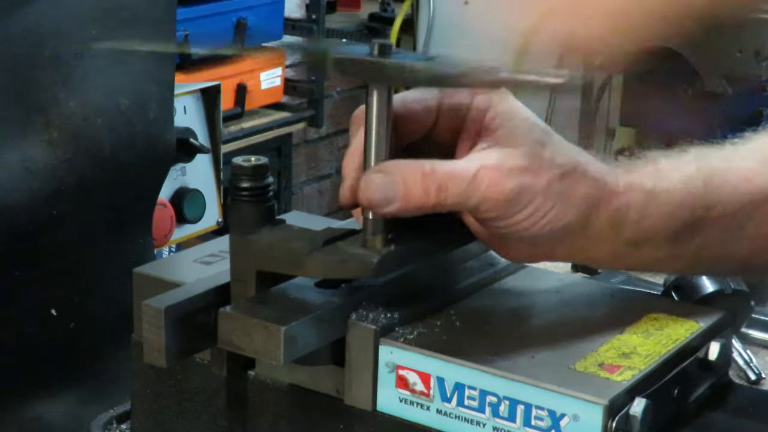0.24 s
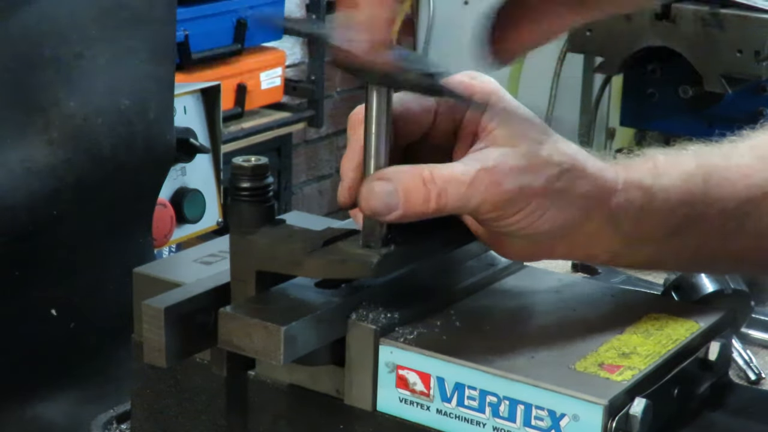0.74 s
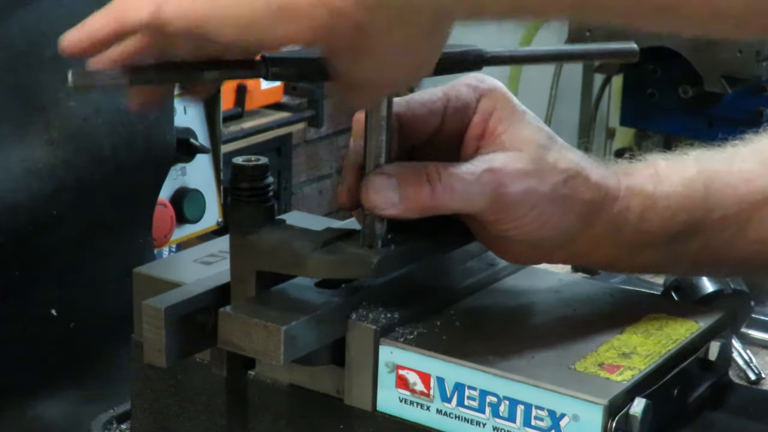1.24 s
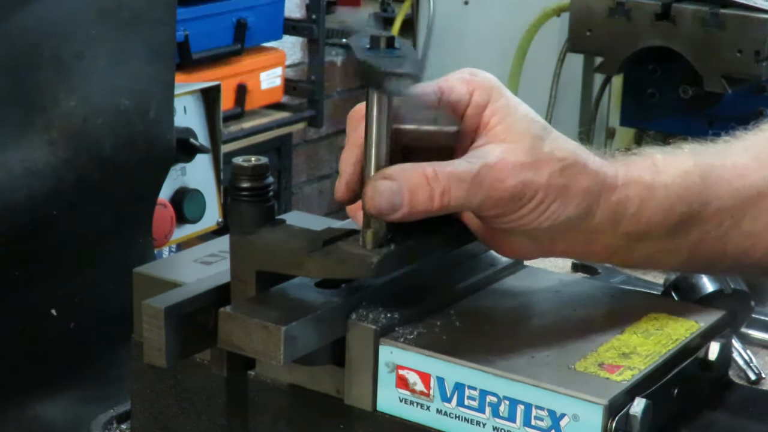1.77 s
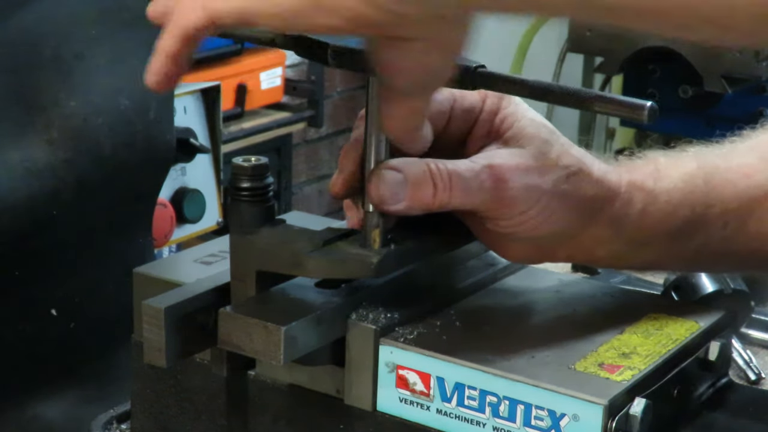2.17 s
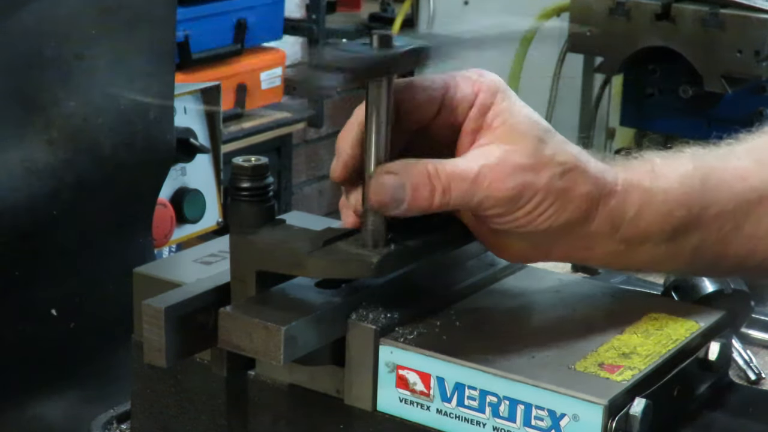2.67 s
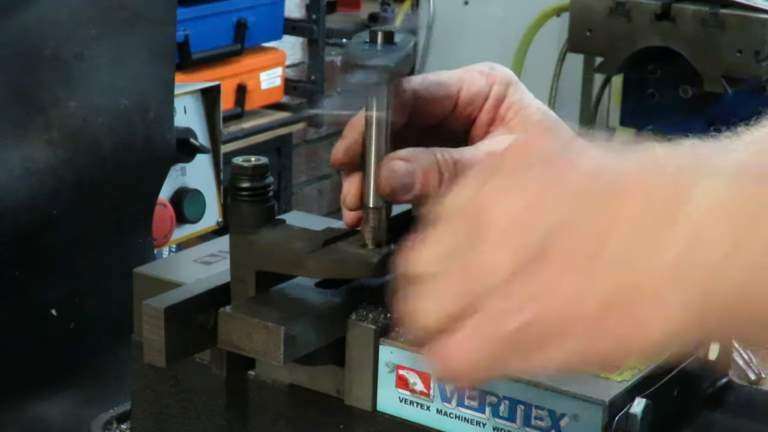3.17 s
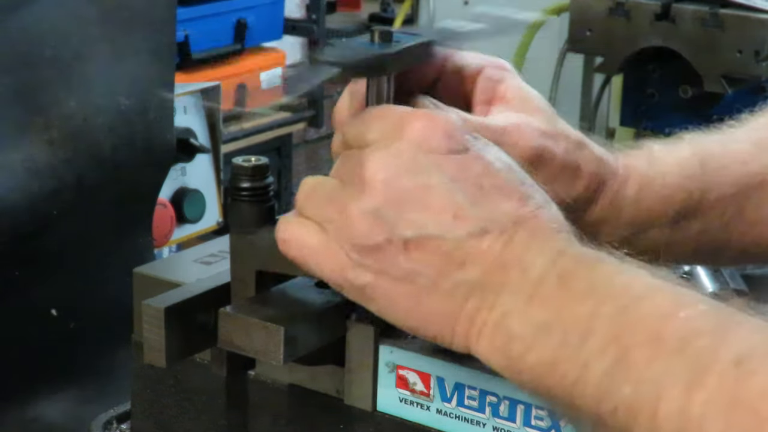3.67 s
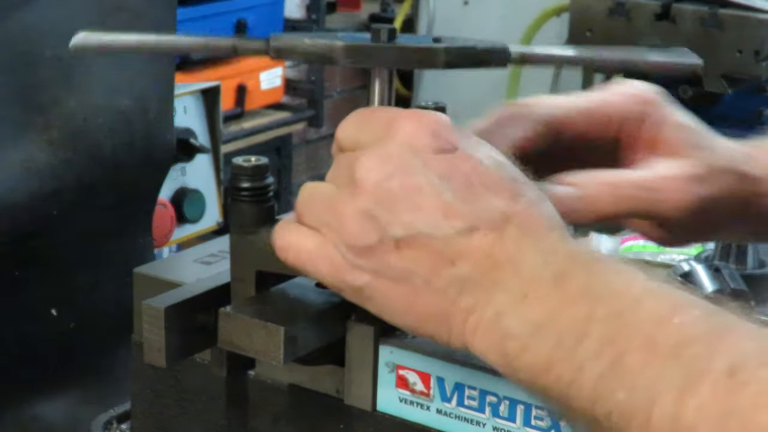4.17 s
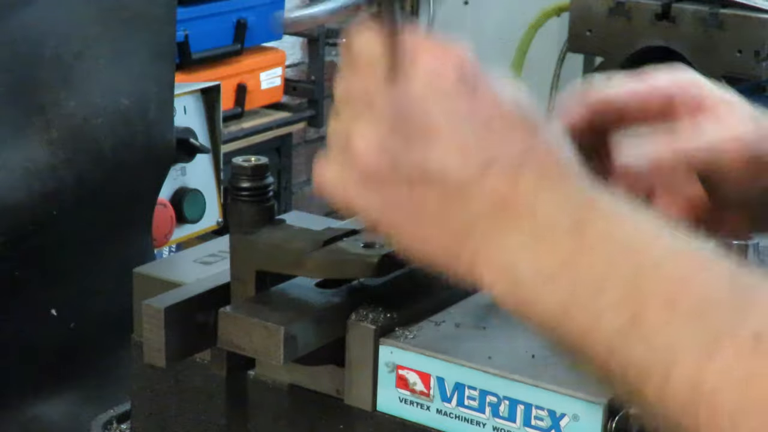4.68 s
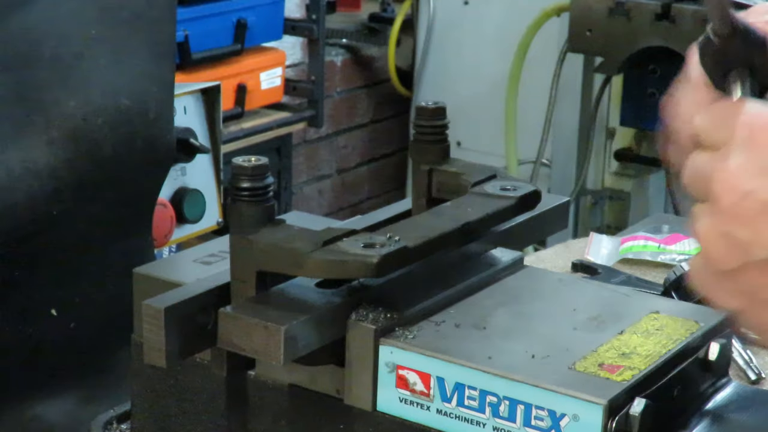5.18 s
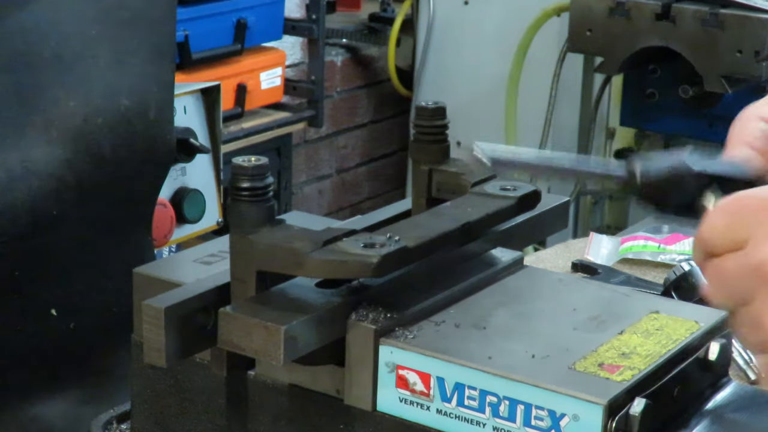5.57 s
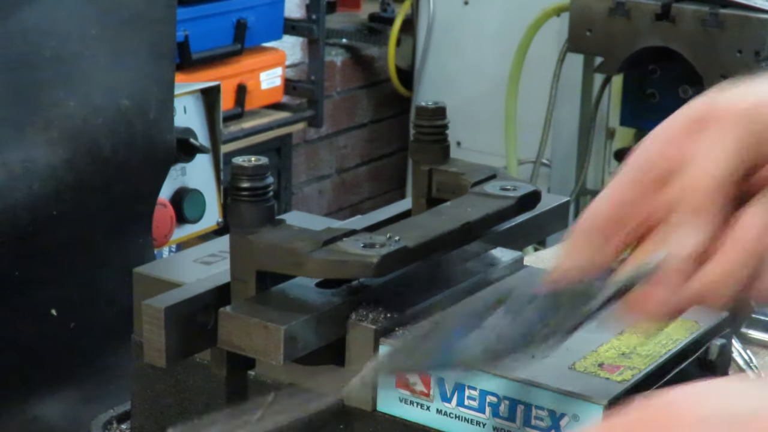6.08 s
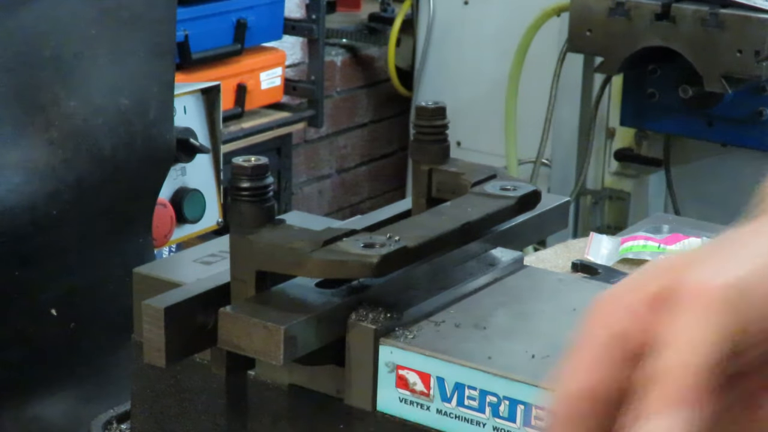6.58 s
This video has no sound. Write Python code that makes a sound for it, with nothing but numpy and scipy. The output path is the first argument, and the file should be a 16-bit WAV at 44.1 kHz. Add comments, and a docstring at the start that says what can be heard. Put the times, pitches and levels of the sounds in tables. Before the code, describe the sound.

A tap wrench spins back out of threaded steel with rasping, chirping scrapes and knocks, then a metal bar drops ringing and the wrench is laid down.

```python
"""A hand tap rasps and rattles as a wrench spins it back out of a threaded steel part in a small workshop.
The rub is made of tiny random slips, coloured by filters and resonances and driven by the wrench's swings.
Knocks, the clamp bar dropping on the vice, clinks, clicks and the wrench being laid down are made of
short contact noise plus ringing modes; the vice booms, the wrench slides, thuds and jingles.
Echoes, mains hum and quiet ventilation noise fill the workshop."""
import sys
import numpy as np
from scipy import signal
from scipy.fft import rfft, irfft
from scipy.io import wavfile
from scipy.ndimage import uniform_filter1d

SR = 44100
rng = np.random.default_rng(int(sys.argv[2]) if len(sys.argv) > 2 else 0)


def wav_record(signal):
    """Record a signal, one row per channel, as 16-bit PCM in the file named by sys.argv[1]."""
    frames = np.transpose(np.atleast_2d(signal))
    bounded = np.clip(frames, -1, 1)
    # unit amplitude maps onto the largest positive 16-bit level
    quanta = np.round(bounded * 32767).astype(np.int16)
    wavfile.write(sys.argv[1], SR, quanta)


N = 300753
HZ = np.fft.rfftfreq(4096, 1 / SR)  # frequencies at which filter curves are drawn

# ringing modes of the vice: (frequency [Hz], relative level [dB], time to fall 60 dB [s])
VICE_MODES = [(151, -29.5, 0.3), (316.7, -27.5, 0.27), (370, -19.5, 0.62), (408, -30, 0.4),
              (437.3, -19.5, 0.34), (574, -29, 0.4), (598, -28, 0.7)]


def gain_of(db):
    """Turns decibels into an amplitude factor."""
    return 10 ** (np.asarray(db) / 20)


def evened(x):
    """Scales a sound to an rms of 1."""
    return x / np.sqrt(np.mean(x ** 2) + 1e-20)


def read(points, hz):
    """Reads a curve between its points, along a logarithmic frequency axis."""
    point_hz, value = np.transpose(points)
    return np.interp(np.log(hz + 1), np.log(point_hz + 1), value)


def fading(t, t60):
    """Exponential decay that falls 60 dB in t60 seconds."""
    return np.exp(-np.log(1000) * t / t60)


def add(mix, s, sound):
    """Mixes a sound in, starting at s seconds."""
    part = mix[max(round(s * SR), 0):][:len(sound)]
    part += sound[:len(part)]


def colour(x, db):
    """Filters with the gain curve db over HZ; it rings after a click, never before (minimum phase)."""
    cepstrum = irfft(np.log(gain_of(np.maximum(db - db.max(), -100))))
    half = len(cepstrum) // 2
    # folding the cepstrum forward puts the whole response after the click
    cepstrum[1:half] *= 2
    cepstrum[half + 1:] = 0
    response = irfft(np.exp(rfft(cepstrum)))
    return signal.oaconvolve(x, response)[:len(x)]


def resonate(x, hz, width):
    """A resonance of gain 1, width in Hz, whose pitch follows the curve hz."""
    turn = np.exp(2j * np.pi * np.cumsum(hz) / SR)
    r = np.exp(-np.pi * width / SR)
    # shift the pitch down to zero, smooth, and shift it back up
    return 2 * (turn * signal.lfilter([1 - r], [1, -r], x / turn)).real


def wander(per_s):
    """A slow random curve of rms 1 that changes about per_s times a second."""
    count = 8192
    hz = np.fft.rfftfreq(count, N / SR / count)
    slow = irfft(rfft(rng.standard_normal(count)) * np.exp(-(hz / per_s) ** 2))
    return evened(np.interp(np.arange(N), np.linspace(0, N, count), slow))


def slips(per_s, spread_db):
    """A random train of tiny slips of either sign, a few larger than the rest."""
    size = gain_of(spread_db * np.minimum(rng.exponential(1, N), 3.5))
    sign = rng.choice([-1., 1.], N)
    happens = rng.random(N) < per_s / SR
    return evened(size * sign * happens)


def stroke(s, db, rise_s, hold_s, stop_s):
    """The gain of one sliding motion: it speeds up until s, holds, and friction slows it evenly."""
    times = s + np.array([-rise_s, 0, hold_s, hold_s + stop_s])
    speed = np.interp(np.arange(N) / SR, times, [0, 1, 1, 0])
    return gain_of(db) * speed ** 2.76  # loudness grows as this power of the speed


def tap_resonance():
    """The lift in dB that the resonances of tap and work give to whatever shakes them."""
    # resonances: (frequency [Hz], width [Hz], lift [dB])
    tap_peaks = [(631, 76, 2.2), (963, 350, 1.5), (1272, 94, 0.72), (1550, 58, 1.77), (1640, 173, 5),
                 (2170, 490, 5.6), (3074, 115, 8.1), (3620, 280, 5.4), (4120, 520, 3.4), (10100, 820, 3.9)]
    return sum(db / (1 + (2 * (HZ - hz) / width) ** 2) for hz, width, db in tap_peaks)


def blows(rows, contact_db, modes, level_db, ring_db, chatter_db, mid_db, vary_db=0, detune=0,
          build_s=0.00071):
    """Each blow is one contact, a dying chatter of the faces, and the ring of the struck steel.

    bass, mid_db and treble set each blow's hardness curve, which counts relative to mid_db;
    level_db shifts every blow's level."""
    shank_db, shank_width_hz = 9.5, 160
    out, t = np.zeros(N), np.arange(SR // 2) / SR
    for s, db, bass_db, treble_db, chatter_s, *shank_hz in rows:
        hardness = read([(600, bass_db), (1400, mid_db), (2800, mid_db), (6500, treble_db)], HZ) - mid_db
        # the tap's shank resonates at a pitch that depends on how it is gripped and seated
        shank = sum(shank_db / (1 + (2 * (HZ - f) / shank_width_hz) ** 2) for f in shank_hz)

        touches = rng.random(len(t)) < .15
        force = rng.standard_normal(len(t)) * touches * np.exp(-t / chatter_s)
        force *= 1 - np.exp(-t / build_s)
        force *= gain_of(chatter_db) / (np.linalg.norm(force) + 1e-9)
        force[0] += 1  # the first contact
        crack = colour(force, contact_db + hardness + shank)
        # the loudest 200 samples get an rms of 1
        crack /= np.sqrt(uniform_filter1d(crack ** 2, size=200, mode="constant").max())

        ring = np.zeros(len(t))
        # each striking place favours other modes, and the grip shifts their pitch
        chances = rng.uniform(-1.03, 1, (len(modes), 2))
        for (hz, mode_db, t60), (luck, shift) in zip(modes, chances):
            size = gain_of(mode_db + vary_db * luck + np.interp(hz, HZ, hardness) / 2)
            ring += size * fading(t, t60) * np.sin(2 * np.pi * hz * (1 + detune * shift) * t)
        add(out, s, gain_of(db + level_db) * (crack + gain_of(ring_db) * ring))
    # deep bass is taken out of every blow
    return signal.sosfilt(signal.butter(6, 112, "high", fs=SR, output="sos"), out)


def workshop(air_db=-49, waver_db=0.3):
    """Ventilation is steady filtered noise; mains equipment hums in sines whose level wavers."""
    # ventilation spectrum: (frequency [Hz], relative level per Hz [dB])
    air_colour = [(12, -58), (20, -19), (68, -12), (101, -8.5), (200, -11.5), (399, -9.5), (527, -14),
                  (678, -15), (849, -19), (1030, -18), (11400, -43), (14000, -47), (15300, -74)]
    # stereo width of the ventilation: (frequency [Hz], side gain [dB])
    air_width = [(60, -25.5), (150, 0.5), (380, 4.5), (950, 1), (2380, 0.5), (5980, 0), (15000, -1)]
    # mains hum: (frequency [Hz], rms level [dB])
    hum_tones = [(100, -60), (200, -60)]
    hz, t = np.fft.rfftfreq(N, 1 / SR), np.arange(N) / SR
    spectrum = rfft(rng.standard_normal((2, N))) * gain_of(read(air_colour, hz))
    spectrum[1] *= gain_of(read(air_width, hz))
    mid, side = irfft(spectrum, N)
    air = evened(np.array([mid + side, mid - side]))
    hum = np.zeros(N)
    for f, db in hum_tones:
        level = np.sqrt(2) * gain_of(db + waver_db * wander(per_s=6))
        hum += level * np.sin(2 * np.pi * (f * t + rng.random()))
    return gain_of(air_db) * air + hum


def room(x, rise_s=0.0012):
    """Sparse echoes that die band by band; the two channels differ most in the treble."""
    # decay of the echoes: (frequency [Hz], time to fall 60 dB [s])
    room_t60 = [(150, 0.37), (600, 0.52), (1700, 0.3632), (4600, 0.4241), (12000, 0.2345)]
    # stereo width of the echoes: (frequency [Hz], side gain [dB])
    room_width = [(150, -11.5), (600, -15.5), (1500, -13), (4000, -10.5), (8000, -2.5), (13000, 2)]
    size = 32768
    taps = rng.choice([-1., 1.], (2, size)) * (rng.random((2, size)) < 4000 / SR)
    hz, t, bands = signal.stft(taps, SR, nperseg=256)
    bands = bands * fading(t, read(room_t60, hz)[:, None])
    bands[1] *= gain_of(read(room_width, hz))[:, None]
    tail = signal.istft(bands, SR, nperseg=256)[1]
    tail *= 1 - np.exp(-(np.arange(tail.shape[1]) / SR / rise_s) ** 2)
    mid, side = signal.fftconvolve(x[None], tail / np.linalg.norm(tail[0]), axes=1)[:, :N]
    return np.array([mid + side, mid - side])


def table_thud():
    """The wrench lands on the table: dull contacts and one short mode."""
    # landings: (time [s], relative level [dB], bass [dB], treble [dB], chatter decay [s])
    landings = [(6.4735, -12, -8, -16, 0.0002), (6.4785, -19.5, -2, -27, 0.0094),
                (6.524, -27, -10, -22, 0.006), (6.556, -30, 1, -40, 0.0028),
                (6.611, -26.5, -5.5, -37, 0.006)]
    # contact spectrum: (frequency [Hz], relative level per Hz [dB])
    contact = [(88, -54), (150, -22), (400, -7), (760, -2.5), (1200, -3.5), (1450, -15), (2000, -15),
               (2650, -33), (4340, -50), (9000, -90)]
    # ringing modes: (frequency [Hz], relative level [dB], time to fall 60 dB [s])
    modes = [(793, -2, 0.059)]
    return blows(landings, read(contact, HZ), modes, level_db=-4.5, ring_db=-12, chatter_db=1, mid_db=-6.5)


def handle_note(hz=4228, struck_t60=0.039, sing_at_s=6.63, sing_db=-34, swell_db_per_s=190, free_t60=0.31):
    """The handle's bending note: short pings when struck, then it swells as the steel skids, and rings out."""
    # strikes on the handle's free end: (time [s], level [dB])
    pings = [(6.405, -46), (6.424, -32), (6.499, -19.5)]
    t = np.arange(N) / SR
    struck = sum(gain_of(db) * (t >= s) * fading(abs(t - s), struck_t60) for s, db in pings)
    growing = gain_of(swell_db_per_s * np.minimum(t - sing_at_s, 0))
    dying = fading(np.maximum(t - sing_at_s, 0), free_t60)
    return (struck + gain_of(sing_db) * growing * dying) * np.sin(2 * np.pi * hz * t)


def handle_jingle():
    """The handle jingles as the wrench is laid down: bright blows that each favour other modes."""
    # blows: (time [s], relative level [dB], bass [dB], treble [dB], chatter decay [s])
    jingles = [(6.3975, -29.5, -2, -25, 0.005), (6.4053, -21.5, -27, -14.5, 0.0042),
               (6.4233, -25, -25, -17, 0.0088), (6.4991, -15, -19, -9.5, 0.0046),
               (6.5294, -20, -17, -17, 0.0085), (6.6114, -17.5, -18, -12.5, 0.011),
               (6.6324, -20.5, -43, -13, 0.015), (6.6942, -20.5, -28, -16, 0.016),
               (6.8009, -27.5, -30, -21, 0.0097)]
    # contact spectrum: (frequency [Hz], relative level per Hz [dB])
    contact = [(290, -2.5), (500, -0.5), (1070, -4), (1880, -9), (3400, 1), (4700, -6.5), (5900, -10),
               (7900, -11), (9200, -17), (10700, -6), (12500, -15), (14000, -15), (15500, -24)]
    # ringing modes: (frequency [Hz], relative level [dB], time to fall 60 dB [s])
    modes = [(3450, -14, 0.11), (5810, -7.5, 0.11), (5950, -4, 0.1), (7050, -11, .08), (7930, -4.5, 0.094),
             (8800, -11, 0.1), (10560, -9.5, 0.15), (11900, -14, .1), (14000, -13, 0.076), (14135, -8, .1)]
    return blows(jingles, read(contact, HZ), modes, level_db=-11.0, ring_db=-11.5, chatter_db=14,
                 mid_db=-19.0, vary_db=10.0, detune=0.012, build_s=0.00074)


def jaw_clicks():
    """The wrench clicks in the hand: its jaws ring very briefly."""
    # clicks: (time [s], relative level [dB], bass [dB], treble [dB], chatter decay [s])
    clicks = [(5.9189, -26, -28, -21, 0.0056), (5.9234, -26, -10, -12, 0.002),
              (5.9444, -40, -34, -37, 0.0039)]
    # contact spectrum: (frequency [Hz], relative level per Hz [dB])
    contact = [(410, -49), (700, -26), (1100, -9), (1780, -27), (1950, -9), (2770, -3), (4770, -14.5),
               (5790, -12), (9230, -18), (10900, -10.5), (14500, -27), (15500, -36)]
    # ringing modes: (frequency [Hz], relative level [dB], time to fall 60 dB [s])
    modes = [(2070, -2, 0.089), (2560, 5, 0.08), (2690, 4, 0.08), (3320, -14, 0.054), (3440, 0, 0.06),
             (3940, 6, 0.05), (6000, -13, 0.06)]
    return blows(clicks, read(contact, HZ), modes, level_db=-5.5, ring_db=-11.0, chatter_db=20, mid_db=-20.0)


def slide():
    """The handle slides through the fingers: a short dry swish made of dense slips."""
    # spectrum of the swish: (frequency [Hz], relative level per Hz [dB])
    swish_colour = [(530, -53), (900, -21), (1090, -1), (1270, -23), (1890, -5), (2990, -6.5), (6000, -6),
                    (11400, -24), (12900, -7), (15000, -46.5)]
    speed = stroke(s=5.81, db=-45.5, rise_s=0.076, hold_s=0.0061, stop_s=0.05)
    swish = colour(slips(per_s=4200, spread_db=5.5), read(swish_colour, HZ) + tap_resonance())
    return speed * evened(swish)


def part_clink():
    """A loose steel part is struck as the hand leaves, and its modes ring."""
    # blows: (time [s], relative level [dB], bass [dB], treble [dB], chatter decay [s])
    clinks = [(5.0969, -23, -17.5, -17.5, 0.012)]
    # contact spectrum: (frequency [Hz], relative level per Hz [dB])
    contact = [(150, -51), (300, -27), (660, -2), (829, -20), (1200, -10), (1800, -15.5), (2500, -23.5),
               (3440, -14), (5100, -26.5), (5850, -23), (12000, -31), (15000, -41)]
    # ringing modes: (frequency [Hz], relative level [dB], time to fall 60 dB [s])
    modes = [(376, -20.5, 0.76), (660, -12, 0.19), (696.9, -2, 0.45), (1470, -9, 0.32), (1885, -9, 0.15),
             (2970, -13.5, 0.18), (3310, -13, 0.16), (3530, -8, 0.11), (5920, -6.5, 0.063),
             (10200, -13, 0.12)]
    return blows(clinks, read(contact, HZ), modes, level_db=-1.0, ring_db=-3.0, chatter_db=10, mid_db=-17.5)


def vice_boom(struck_s=4.7944, build_s=0.0034, level_db=1, rattle_db=0.5, settle_s=4.934, choke_s=0.006):
    """The vice booms in close, beating modes while the bar rattles on it; the bar lies flat and chokes them."""
    out, t = np.zeros(N), np.arange(SR // 2) / SR
    ring = sum(gain_of(db) * fading(t, t60) * np.sin(2 * np.pi * hz * t) for hz, db, t60 in VICE_MODES)
    choke = np.exp(-np.maximum(struck_s + t - settle_s, 0) / choke_s)
    add(out, struck_s, ring * (1 - np.exp(-t / build_s)) * choke)
    # the rattle makes the level waver
    return out * gain_of(level_db + rattle_db * wander(per_s=70))


def bar_drop():
    """The clamp bar drops on the vice and bounces: hard contacts and the bar's long high modes."""
    # blows: (time [s], relative level [dB], bass [dB], treble [dB], chatter decay [s])
    drops = [(4.7878, -12.5, -5, -23, 0.01), (4.7944, -9.5, -18, -14, 0.002),
             (4.8035, -20.5, -10.5, -14.5, 0.029), (4.8345, -18.5, 4.5, -16, 0.001),
             (4.8645, -23, 5, -27, 0.0015)]
    # contact spectrum: (frequency [Hz], relative level per Hz [dB])
    contact = [(90, -54), (140, -36), (250, -14.5), (400, -2), (505, -10.5), (590, -6.5), (814, -12.5),
               (1160, -8), (1400, -12.5), (2420, -12), (2860, -16), (3180, -13.5), (6910, -24.5),
               (10300, -23), (11200, -16.5), (13200, -26), (15000, -55)]
    # ringing modes: (frequency [Hz], relative level [dB], time to fall 60 dB [s])
    modes = [(2426, -11.5, 0.2), (3180, -6.5, 0.16), (3880, -5, .18), (5980, -16, 0.19), (10850, -14, 0.62),
             (10840, -10, 0.9)]
    return blows(drops, read(contact, HZ), modes, level_db=-1.0, ring_db=-16.5, chatter_db=8.5, mid_db=-14.0)


def palm_bump():
    """The palm bumps the handle to start it spinning: a soft contact with no ring."""
    # bumps: (time [s], relative level [dB], bass [dB], treble [dB], chatter decay [s])
    bumps = [(0.288, -35, -20, -20, 0.019)]
    # contact spectrum: (frequency [Hz], relative level per Hz [dB])
    contact = [(50, -11), (135, -8), (250, -29), (450, -4), (900, -14), (3000, -55)]
    return blows(bumps, read(contact, HZ), [], level_db=1.0, ring_db=0, chatter_db=25, mid_db=-24)


def tip_ticks():
    """The freed tip of the tap ticks on the mouth of the hole, ringing for a moment."""
    # ticks: (time [s], relative level [dB], bass [dB], treble [dB], chatter decay [s])
    ticks = [(3.609, -27, -17, -8.5, 0.003), (3.776, -16, -22, -21.5, 0.0047),
             (4.19, -19, -14.5, -4, 0.0036)]
    # contact spectrum: (frequency [Hz], relative level per Hz [dB])
    contact = [(500, -24), (1900, -5.5), (2700, -8.5), (3500, 3), (3850, -7), (4400, -7.5), (5700, -18.5),
               (9800, -15.5), (11300, -22), (13200, -25), (15000, -55)]
    # ringing modes: (frequency [Hz], relative level [dB], time to fall 60 dB [s])
    modes = [(3156, 1, 0.07), (3540, 1.5, 0.047), (4290, -1.5, 0.06)]
    return blows(ticks, read(contact, HZ), modes, level_db=-12.0, ring_db=-9.5, chatter_db=11, mid_db=-14.5)


def tap_knocks():
    """The wrench and the loose tap knock together; the shank adds its own resonance to every knock."""
    # knocks: (time [s], relative level [dB], bass [dB], treble [dB], chatter decay [s], shank pitch [Hz])
    knocks = [(0.008, -34.5, 3, -12.5, 0.019, 2950), (0.281, -23.5, -1, -10.5, 0.0094, 2830),
              (0.36, -12, -24, -34, 0.036, 3080), (0.365, -13, -24, -1, 0.0055, 3150),
              (0.3705, -13.5, -8, 3, 0.0026, 3100), (0.404, -23, -31, -27, 0.017, 3440),
              (0.4325, -19.5, -18, -48, 0.0047, 3400), (0.561, -32, -21, -40, 0.0068, 3110),
              (0.591, -19.5, -14, -19.5, 0.0083, 2810), (0.679, -20, -8, -7.5, 0.01, 3300),
              (0.706, -16.5, -4, -14.5, 0.0082, 3160), (0.875, -37, 1, -16, 0.0054, 3430),
              (1.397, -48, -11, -20, 0.004, 3120), (1.466, -26.5, -22, -27, 0.011, 3120),
              (1.5465, -23, -16, -41, 0.003, 2500), (1.577, -20, -5, -40, 0.012, 3180),
              (1.604, -22.5, -5, -21, 0.0034, 3130), (1.799, -22, -10.5, -70, 0.0062, 3320),
              (1.813, -24.5, -1, -78, 0.024, 3200), (1.986, -35, -19, -18.5, 0.0056, 3780),
              (2.746, -24, 2, -13, 0.016, 3100), (3.14, -34.5, 5, -18, 0.012, 3230),
              (3.311, -33.5, -12, -21, 0.011, 4200), (3.33, -27, -13, -19.5, 0.0092, 4180),
              (3.847, -16, -6, -11, 0.0015, 2650), (3.852, -17, -16, -32, 0.01, 3250),
              (3.877, -23, -36, -23, 0.019, 4200), (4.105, -25.5, 7, -6.5, 0.019, 3240),
              (4.171, -29, -18, -10, 0.014, 3870), (4.294, -26.5, -27, -34, 0.014, 2370),
              (4.303, -20, -14, -16.5, 0.014, 3340), (4.654, -31, 2, -14.5, 0.028, 2770)]
    # contact spectrum: (frequency [Hz], relative level per Hz [dB])
    contact = [(88, -32), (150, -23.5), (330, -15), (660, -11), (1050, -4), (1300, 2), (2020, -3.5),
               (2810, -7), (3300, -7.5), (5000, -12), (7000, -18), (9300, -18.5), (11500, -26),
               (13200, -17), (15000, -74)]
    # ringing modes: (frequency [Hz], relative level [dB], time to fall 60 dB [s])
    modes = [(645, 6.5, 0.28), (942, 5.5, 0.12), (1324, 9.5, 0.14), (1560, -5, 0.104), (3090, -5, .13),
             (4250, -1.5, 0.14)]
    return blows(knocks, read(contact, HZ) + tap_resonance(), modes, level_db=-11.5, ring_db=-21.0,
                 chatter_db=11.0, mid_db=-15.5, vary_db=7.5, detune=0.017, build_s=0.00096)


def thread_chirps():
    """The thread chirps where it binds: noise feeds two resonances in a row that glide in pitch."""
    # chirps: (time [s], length [s], start pitch [Hz], end pitch [Hz], level [dB], resonance width [Hz])
    glides = [(0.355, 0.043, 788, 526, -30.5, 60), (0.412, 0.051, 1003, 895, -30, 60),
              (0.398, 0.074, 1650, 1494, -36.5, 90), (0.53, 0.047, 880, 1020, -41, 60),
              (0.577, 0.061, 629, 704, -38, 35), (0.695, 0.039, 2030, 1980, -35.5, 120),
              (1.456, 0.067, 1210, 1420, -35.5, 260), (1.543, 0.041, 1180, 1320, -33.5, 260),
              (2.719, 0.05, 1500, 1360, -38, 400)]
    out = np.zeros(N)
    for s, length, start_hz, end_hz, db, width_hz in glides:
        hz = np.linspace(start_hz, end_hz, max(round(length * SR), 2))
        drive = rng.standard_normal(len(hz))
        squeak = resonate(resonate(drive, hz, width_hz), hz, 2 * width_hz)
        add(out, s, gain_of(db) * evened(squeak * signal.windows.tukey(len(hz), .5)))
    return out


def crushing():
    """How hard chips are crushed in the flutes while the hand drives the wrench."""
    # crushes: (time [s], length at full strength [s], level [dB])
    crushes = [(0.365, 0.005, -34.5), (0.697, 0.0039, -54), (1.437, 0.12, -44), (2.651, 0.073, -46.5)]
    return sum(stroke(s, db, rise_s=0.097, hold_s=length, stop_s=0.13) for s, length, db in crushes)


def rubbing():
    """How hard the tap rubs: swings of the wrench, and flutes catching briefly on the thread's flank."""
    # swings: (at full speed [s], speeds up for [s], driven for [s], coasts for [s], relative level [dB])
    swing_rows = [(0.0, 0.2, 0.01, 0.27, -50.5), (0.39, 0.19, 0.008, 0.73, -33),
                  (0.7, 0.18, 0.14, 0.46, -42.5), (1.484, 0.19, 0.092, 0.5, -36),
                  (2.742, 0.27, 0.016, 0.71, -35.5), (3.1, 0.23, 0.066, 0.52, -48.5),
                  (3.29, 0.16, 0.09, 0.4, -46.5), (3.82, 0.22, 0.088, 0.53, -43),
                  (4.14, 0.26, 0.085, 0.42, -42.5)]
    # catches: (time [s], relative level [dB])
    catch_rows = [(0.29, -50), (0.368, -43), (0.597, -31.5), (0.69, -30.5), (1.81, -40), (1.995, -50),
                  (3.614, -41), (3.778, -39.5), (3.857, -50), (4.11, -45), (4.2, -36.5), (4.303, -38.5)]
    swings = sum(stroke(s, db, rise_s, driven_s, coast_s) ** 2
                 for s, rise_s, driven_s, coast_s, db in swing_rows)
    catches = sum(stroke(s, db, rise_s=0.034, hold_s=0.0052, stop_s=0.12) ** 2 for s, db in catch_rows)
    return np.sqrt(swings + catches)


def thread(rasp_db=-4, sing_db=-10.0, vice_db=-14.5, loose_grit_db=-16.5, clump_db=2.0, drift=0.0437):
    """The flutes stick and slip in clumps and sing at drifting pitches; the vice drones; chips add grit."""
    # spectrum of the rubbing thread: (frequency [Hz], relative level per Hz [dB])
    rub_colour = [(88, -57), (150, -14.5), (273, -13.5), (322, 2.5), (416, -8), (636, -3), (742, 0.5),
                  (1250, 0.5), (2700, -15.5), (3090, -16.5), (6180, -37), (11500, -55), (13100, -24),
                  (15000, -46)]
    # spectrum of the crushed chips: (frequency [Hz], relative level per Hz [dB])
    grit_colour = [(400, -73), (1200, -0.5), (2000, 10.5), (2600, -6), (3100, 0), (4300, -4.5), (6000, -11),
                   (9000, -16), (12300, -18.5), (13150, -7.5), (13900, -24.5), (15000, -53)]
    clumps = gain_of(clump_db * wander(per_s=59))
    rub = rubbing()
    rasp = evened(colour(slips(per_s=480, spread_db=0.5), read(rub_colour, HZ) + tap_resonance()))
    sing = evened(sum(resonate(rasp, hz * np.exp(drift * wander(per_s=8.8)), width=13.5)
                      for hz in (654.0, 903.5, 1240.0, 1333, 1489, 1621)))
    # level differences between the vice's modes are halved in the drone
    drone = evened(sum(gain_of(db / 2) * resonate(rasp, np.full(N, hz), width=12)
                       for hz, db, _ in VICE_MODES))
    steel = gain_of(rasp_db) * rasp + gain_of(sing_db) * sing + gain_of(vice_db) * drone
    grit = evened(colour(slips(per_s=4000, spread_db=0.5), read(grit_colour, HZ)))
    # a few chips stay in the flutes and follow the rub
    chips = crushing() + gain_of(loose_grit_db) * rub
    return clumps * (rub * steel + chips * grit)


def scene():
    """The work and the vice are close by; the slide, clinks, clicks and jingles get a little more of the room,
    the landing on the table a little less, and the handle's note none."""
    background = workshop()
    thud = table_thud()
    aside = slide() + part_clink() + jaw_clicks() + handle_jingle()
    boom, bar = vice_boom(), bar_drop()
    work = thread() + thread_chirps() + tap_knocks() + tip_ticks() + palm_bump()
    to_room = gain_of(-6.0) * work + gain_of(-9.5) * bar + gain_of(-18.5) * boom
    to_room += gain_of(-5.0) * aside + gain_of(-7.5) * thud
    leaning_boom = boom * gain_of([[1], [-1]])  # a little to the left
    return work + bar + leaning_boom + aside + handle_note() + thud + room(to_room) + background


def record(dry):
    """Rounds the very loudest peaks, then cuts the treble above the band's edge."""
    edge_hz = 15700
    rounded = dry / (1 + (dry / .8) ** 4) ** .25
    lowpass = signal.firwin(255, edge_hz, window=("kaiser", 9), fs=SR)
    return signal.oaconvolve(rounded, lowpass[None], "same")


dry = scene()
out = record(dry)
wav_record(out)
```